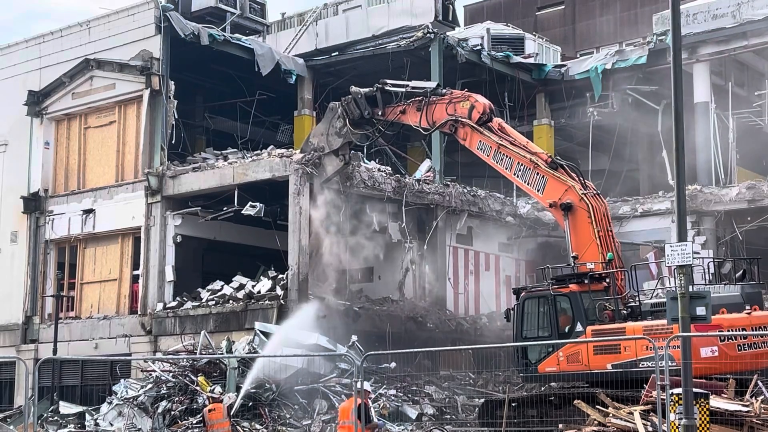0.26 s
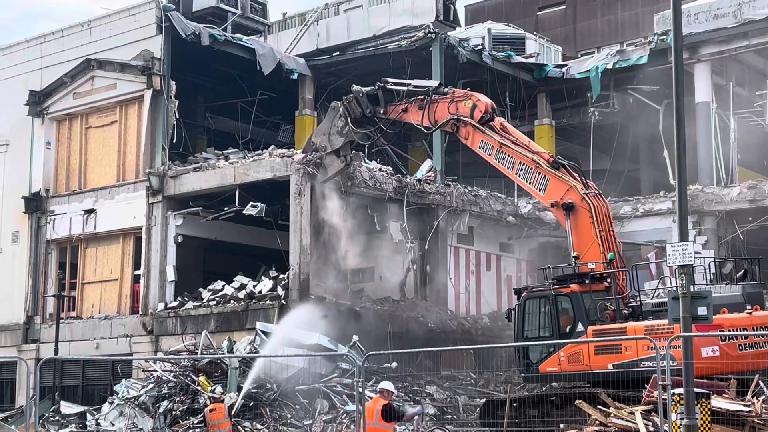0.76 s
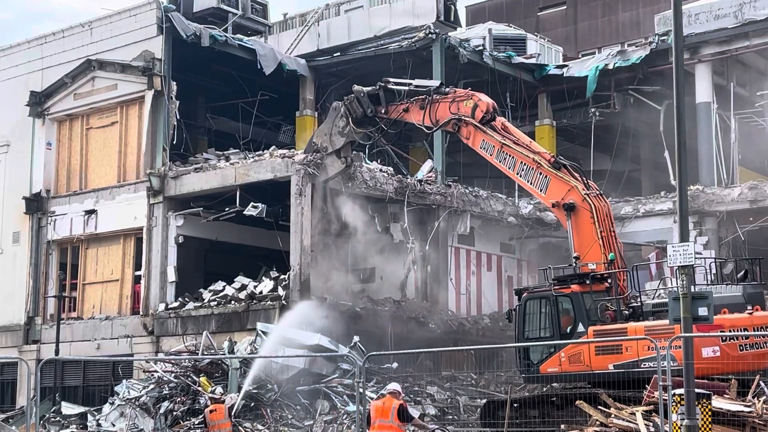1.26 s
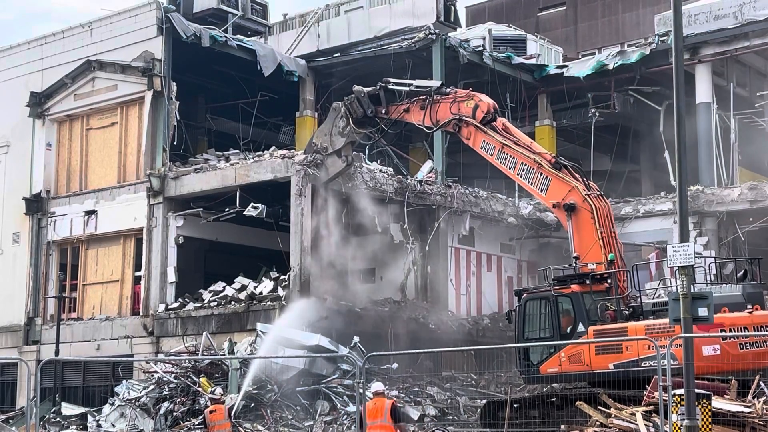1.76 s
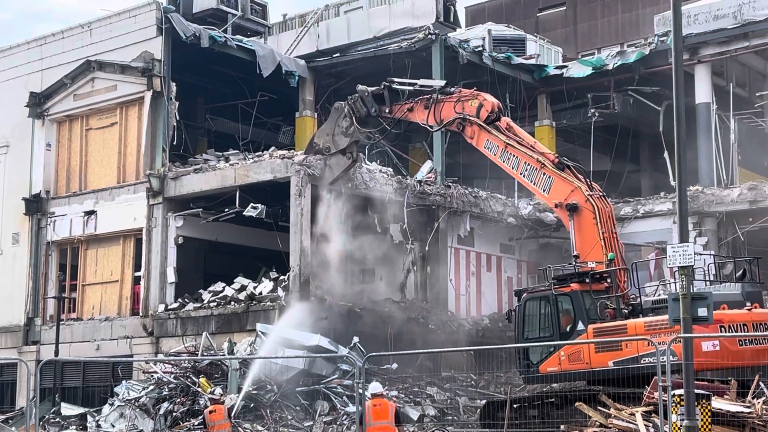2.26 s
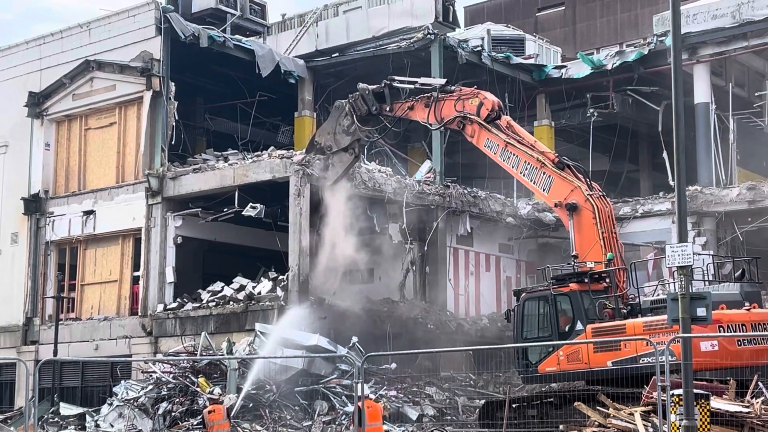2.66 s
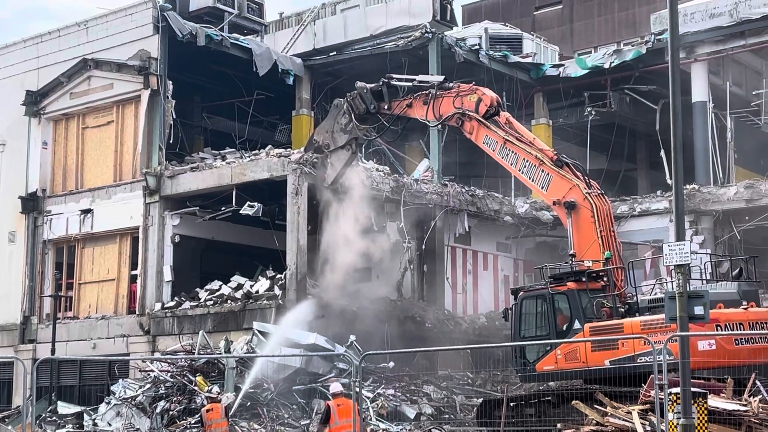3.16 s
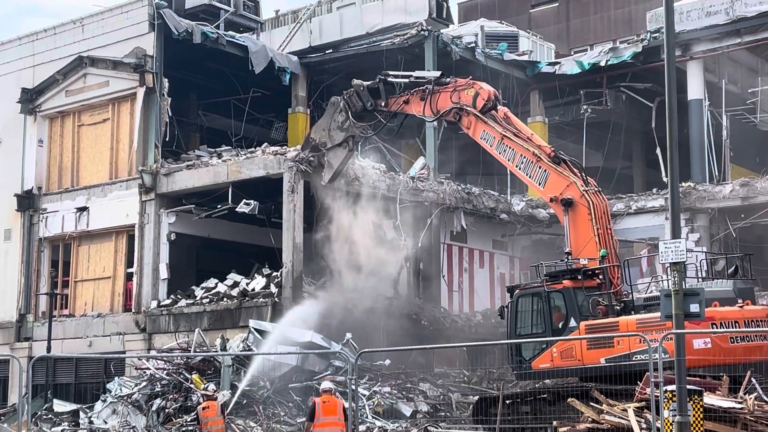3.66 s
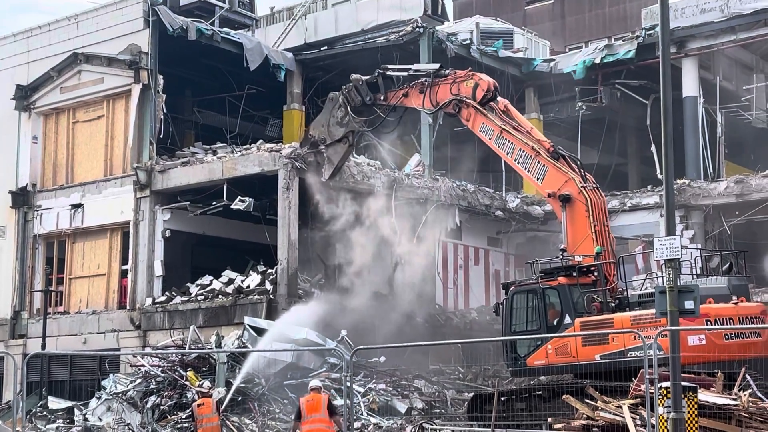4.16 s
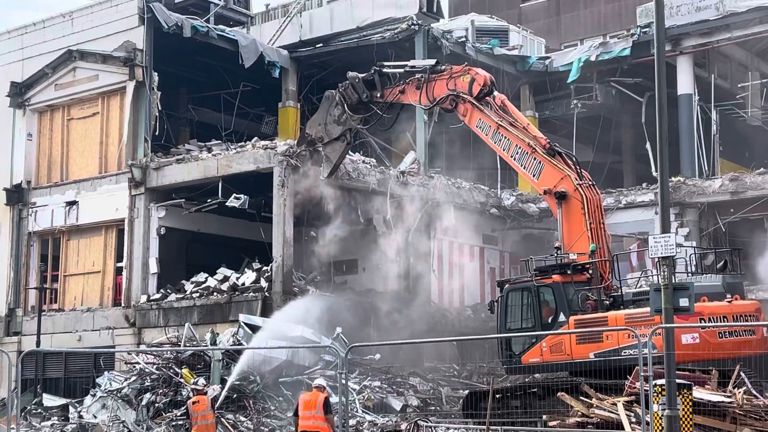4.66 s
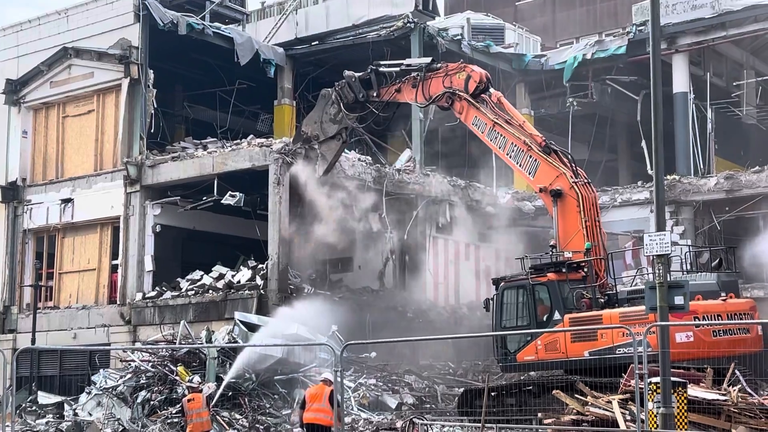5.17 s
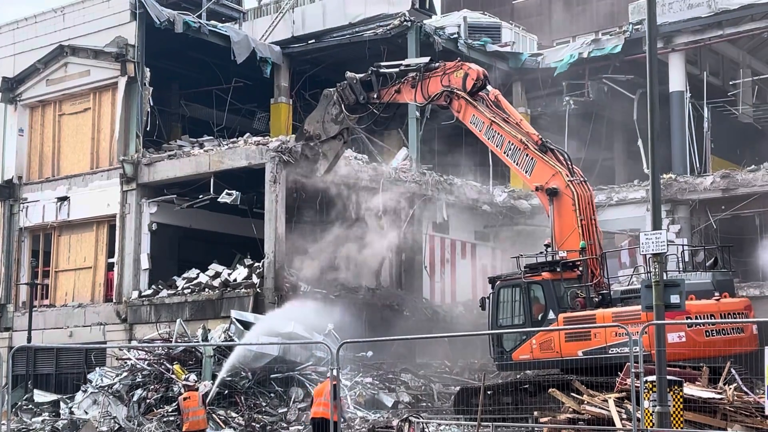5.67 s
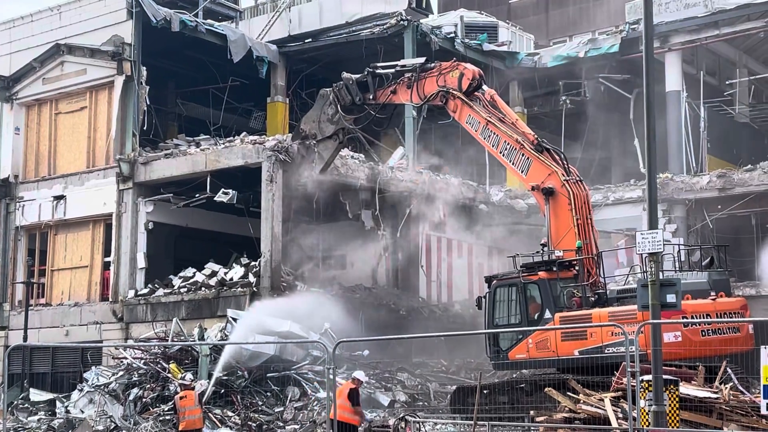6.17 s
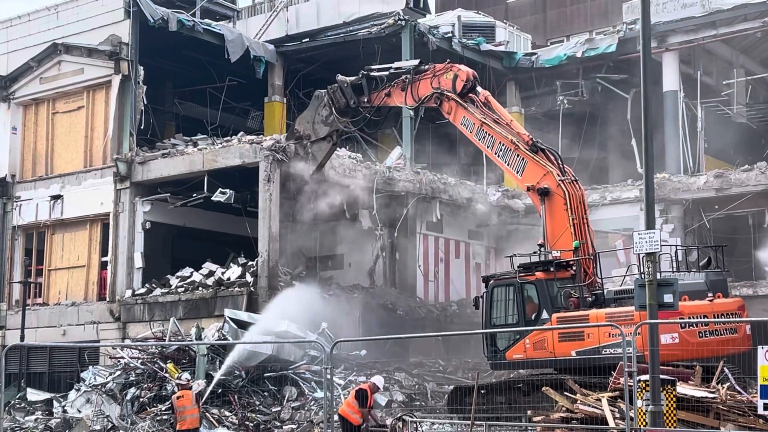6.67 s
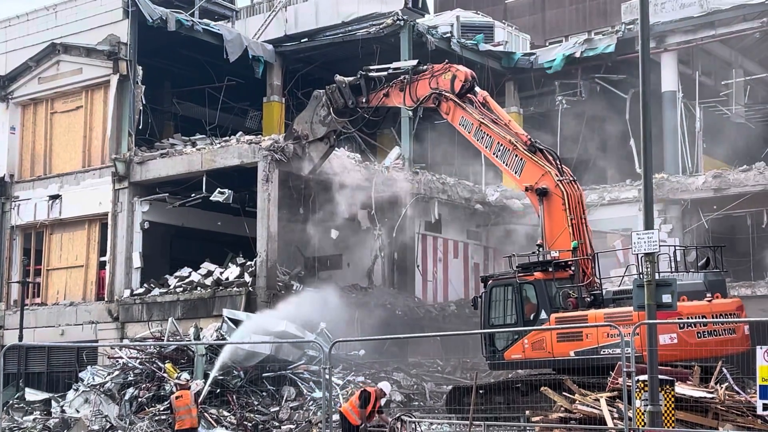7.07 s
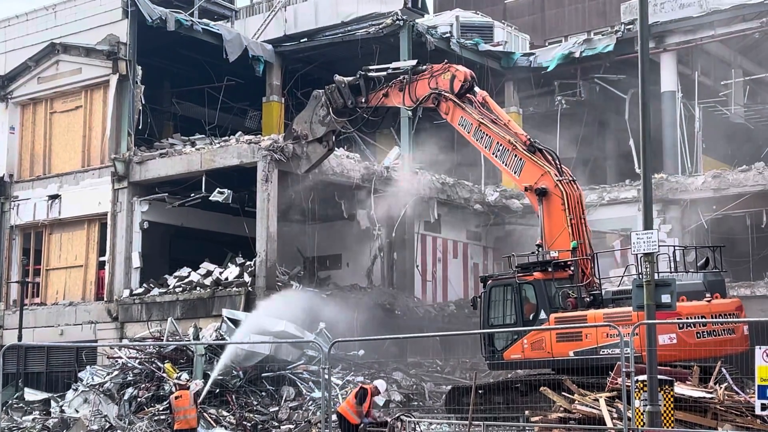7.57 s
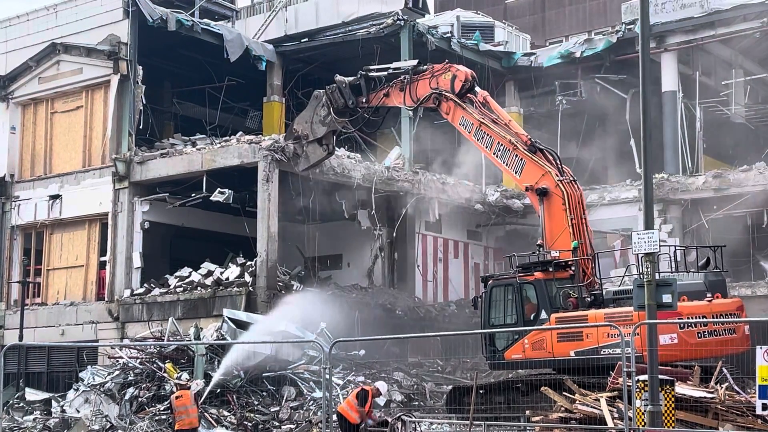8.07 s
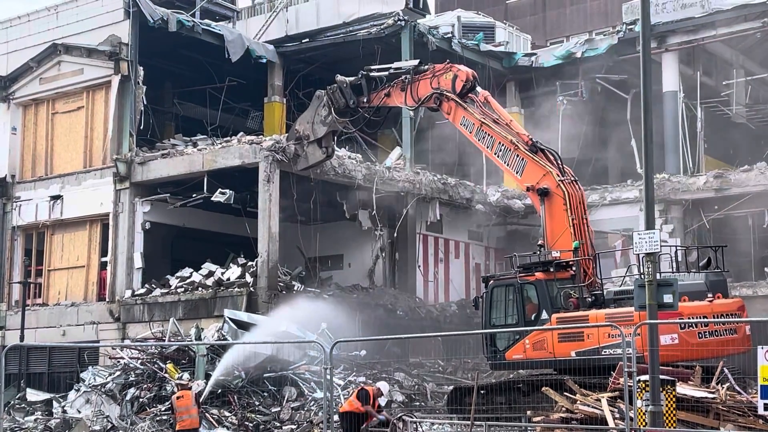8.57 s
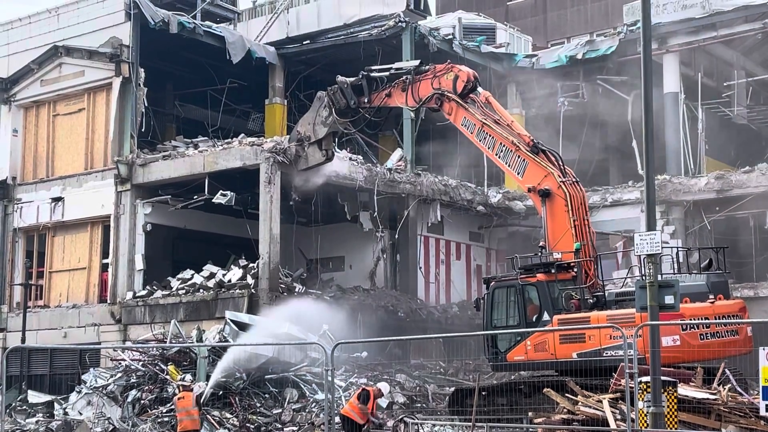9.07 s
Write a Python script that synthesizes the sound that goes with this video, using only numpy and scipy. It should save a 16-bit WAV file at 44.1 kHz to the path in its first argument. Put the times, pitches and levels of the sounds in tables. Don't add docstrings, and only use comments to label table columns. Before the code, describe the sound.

Wind buffets the microphone as a diesel excavator crushes concrete, with cracks, thuds and pouring rubble over a steady hose hiss.

```python
import sys
import numpy as np
from scipy import signal
from scipy.fft import rfft, irfft
from scipy.io import wavfile

SR = 44100
rng = np.random.default_rng(int(sys.argv[2]) if len(sys.argv) > 2 else 0)


def transcribe(u):
    v = np.clip(np.atleast_2d(u).T, -1, 1)
    q = np.round(v * 32767).astype(np.int16)
    wavfile.write(sys.argv[1], SR, q)


def attenuation_scalar(level_db):
    decades = np.asarray(level_db, float) / 20
    return 10 ** decades


N = 411012
CLUMP_DB = 1.3


def in_time(rows):
    s, *columns = np.transpose(rows)
    return [np.interp(np.arange(N) / SR, s, c) for c in columns]


def at_hz(points, hz):
    table_hz, values = np.transpose(points)
    return np.interp(np.log(hz + 1), np.log(table_hz + 1), values)


def rms_one(x):
    return x / np.sqrt(np.mean(x ** 2) + 1e-20)


def drift(rate):
    r = np.exp(-40 * np.pi * rate / SR)
    white = rng.standard_normal(N // 20 + 2002)
    slow = signal.lfilter([1], [1, -2 * r, r * r], white)[2000:]
    return np.interp(np.arange(N) / 20, np.arange(len(slow)), rms_one(slow))


def band(x, low_hz, high_hz, order=2):
    return signal.sosfilt(signal.butter(order, [low_hz, high_hz], "band", fs=SR, output="sos"), x)


def resonance(x, hz, width_hz):
    r = np.exp(-np.pi * width_hz / SR)
    poles = [1, -2 * r * np.cos(2 * np.pi * hz / SR), r * r]
    return signal.lfilter([(1 - r * r) / 2, 0, (r * r - 1) / 2], poles, x)


def body(x, modes):
    return sum((-1) ** k * attenuation_scalar(db) * resonance(x, hz, w) for k, (hz, w, db) in enumerate(modes))


def coloured(x, spectrum):
    hz = np.fft.rfftfreq(N, 1 / SR)
    slope_db = at_hz(spectrum, hz) - 24 * np.maximum(np.log2(spectrum[0][0] / (hz + 1)), 0)
    return rms_one(irfft(rfft(x) * attenuation_scalar(slope_db), N))


def grains(per_s, spread_db):
    sizes = attenuation_scalar(spread_db * np.minimum(rng.exponential(1, (2, N)), 5))
    signs = rng.choice([-1, 1], (2, N))
    return sizes * signs * (rng.random((2, N)) < per_s / SR)


def bursts(rows, rise_db_s, fall_db_s, floor_db):
    t, out = np.arange(0, N, 32) / SR, floor_db
    for s, length, db, swell_db in rows:
        hold = db + swell_db * (np.clip((t - s) / length, 0, 1) - .5)
        rise = rise_db_s * np.maximum(s - t, 0)
        fall = fall_db_s * np.maximum(t - s - length, 0)
        out = np.maximum(out, hold - rise - fall)
    return np.interp(np.arange(N) / SR, t, out)


def add(out, at_s, piece):
    i = round(at_s * SR)
    out[:, i:i + piece.shape[1]] += piece[:, :N - i]


# [f/Hz, level/dB per Hz]
SPRAY_COLOUR = [(200, 16), (500, 2), (1000, -8), (1900, -21), (2200, -8), (2800, -24), (5000, -14),
                (7000, -13), (10000, -10), (13000, -11.5), (15000, -15.5), (16000, -50)]
# [t/s, level/dB]
HOSE_SWEEP = [(0, 1), (0.55, 1.5), (1.5, 0.5), (2.75, 1.5), (3.2, 0), (8.35, 0.7), (8.5, -2.5), (8.9, -3),
              (9.2, 0.5)]
SPRAY_DB = -39


def spray():
    level_db = SPRAY_DB + in_time(HOSE_SWEEP)[0] + CLUMP_DB / 2 * drift(2.8)
    return attenuation_scalar(level_db) * coloured(rng.standard_normal((2, N)), SPRAY_COLOUR)


# [t/s, level/dB]
GUST_THUMP = [(0, -20), (0.33, -24.5), (0.43, -27), (0.88, -23), (0.95, -21.5), (1.17, -27), (1.45, -20.5),
              (1.8, -22), (1.92, -27), (2.2, -23.5), (2.4, -29), (2.9, -25.5), (3.6, -25.5), (4.6, -28.5),
              (5.8, -25), (6.95, -28.5), (8.0, -23), (9.32, -13.5)]
# [t/s, length/s, level/dB, swell from start to end/dB]
GUST_RASP = [(0.0, 0.19, -18, 0.5), (0.225, 0.074, -17.5, -2), (0.3, 0.054, -19, 2.5),
             (0.862, 0.083, -22, 8), (0.934, 0.28, -19, 4), (1.255, 0.055, -18.5, -1),
             (1.337, 0.021, -15, 0), (1.385, 0.055, -17, -5), (1.45, 0.028, -16.5, 7), (1.51, .03, -22, 1),
             (1.55, 0.2, -22.5, -5.5), (1.775, 0.098, -25, -4), (1.955, 0.07, -27, -2),
             (2.04, 0.22, -24, 2), (2.23, 0.13, -23.5, -8), (2.48, 0.043, -27.5, 13), (2.6, 0.13, -26, -4),
             (2.78, 0.14, -25, 3), (3.05, 0.17, -30.5, 13), (3.26, 0.18, -24.5, 6.5), (3.51, 0.042, -20, 7),
             (3.58, 0.082, -21.5, -6), (3.695, 0.054, -19.5, -7), (3.75, 0.012, -24.5, -10),
             (3.79, 0.031, -23, -2), (3.97, 0.1, -30, 7), (4.35, 0.01, -29, 3), (5.15, 0.21, -31, 8),
             (5.42, 0.19, -30.5, -3), (5.605, 0.26, -26, -1), (5.88, 0.1, -18, 6), (6.0, 0.28, -27, -12),
             (6.28, 0.22, -29.5, 3.5), (6.55, 0.18, -33.5, -8), (7.2, 0.52, -36, 6)]
GUST_RISE_DB_S, GUST_FALL_DB_S, LULL_DB = 2500, 450, -41.5
THUMP_FOLLOWS, MIDDLE_SHARE = 0.24, 0.47


def wind():
    rasp_db = bursts(GUST_RASP, GUST_RISE_DB_S, GUST_FALL_DB_S, LULL_DB)
    thump_db = in_time(GUST_THUMP)[0] + THUMP_FOLLOWS * (rasp_db - rasp_db.mean())
    middle_db = thump_db + MIDDLE_SHARE * (rasp_db - thump_db)
    edge_db = rasp_db + 1.26 * (rasp_db + 18.0)
    lumps, white = drift(39.0), rng.standard_normal((2, 2, N))
    thump = band(white[0], 42.0, 119.0) * attenuation_scalar(1.54 * lumps)
    middle = band(white[1], 90.6, 304.0, order=3) * attenuation_scalar(2.25 * lumps + 2.07 * drift(9.4))
    rasp = band(white[0], 262, 487) * attenuation_scalar(2.54 * lumps + 2.9 * drift(38))
    edge = band(white[1], 567, 852, order=3) * attenuation_scalar(1.0 * lumps + 3.6 * drift(30))
    out = attenuation_scalar(thump_db - 1.5) * rms_one(thump)
    out += attenuation_scalar(middle_db - 2.5) * rms_one(middle)
    out += attenuation_scalar(rasp_db - 4.5) * rms_one(rasp)
    return out + attenuation_scalar(edge_db - 13.5) * rms_one(edge)


# [t
# of the crest/s, peak level/dB, f/Hz]
SWINGS = [(0.04, -18, 397), (0.093, -10, 346), (0.106, -7, 543), (0.16, -5, 420), (0.24, -15, 378),
          (0.266, -11.5, 491), (0.314, -19, 329), (0.833, -12.5, 335), (0.945, -2.5, 426),
          (0.956, -10, 435), (1.002, -9, 490), (1.103, -12, 413), (1.118, -12, 299), (1.158, -8.5, 394),
          (1.188, -7, 550), (1.206, -9, 500), (1.271, -6.5, 516), (1.286, -9, 450), (1.3, -10, 419),
          (1.343, -7, 367), (1.402, -5.5, 366), (1.419, -5, 376), (1.472, -2.5, 480), (1.484, -1, 360),
          (1.618, -9.5, 344), (1.635, -12, 447), (1.791, -11, 280), (1.964, -16.5, 308), (1.98, -17, 367),
          (2.134, -10.5, 413), (2.199, -16, 354), (2.248, -7.5, 368), (2.274, -8.5, 279),
          (2.488, -14.5, 390), (2.836, -15, 325), (2.853, -11, 346), (3.193, -13.5, 404),
          (3.286, -12.5, 284), (3.338, -12, 266), (3.413, -14.5, 326), (3.515, -14, 283), (3.539, -13, 436),
          (3.612, -9, 430), (3.625, -13, 364), (3.706, -17, 402), (3.731, -15, 348), (3.98, -16.5, 361),
          (4.362, -16.5, 327), (5.616, -12.5, 368), (5.656, -14, 250), (5.763, -17, 296),
          (5.885, -9.5, 325), (5.899, -20, 480), (5.916, -11, 348), (5.927, -12, 330), (5.945, -5, 262),
          (5.961, -13, 325), (5.975, -5, 332), (5.986, -12, 270), (6.061, -11.5, 360)]
SWING_CYCLES, SWING_DB, TEAR_SHARE = 1.05, -2.0, 0.4


def buffets():
    half = round(.02 * SR)
    out, t = np.zeros((2, N)), np.arange(-half, half) / SR
    phases = rng.uniform(0, 2 * np.pi, (len(SWINGS), 2, 2, 1))
    for (s, peak_db, hz), phase in zip(SWINGS, phases):
        swing = np.sin(2 * np.pi * hz * t + phase[0])
        swing = swing + TEAR_SHARE * np.sin(2 * np.pi * 1.57 * hz * t + phase[1])
        add(out, s + t[0], attenuation_scalar(peak_db + SWING_DB) * swing * np.exp(-(t * hz / SWING_CYCLES) ** 2))
    return out


# [t/s, level/dB]
POUR_FLOW = [(0.0, -27), (0.3, -32), (1.14, -31.5), (1.82, -34), (3.2, -33.5), (3.66, -31), (4.8, -31.5),
             (5.25, -29.5), (5.6, -24.5), (6.1, -31), (6.49, -30.5), (7.03, -29), (7.32, -31.5),
             (7.66, -32), (8.3, -32), (8.9, -32.5), (9.05, -23.5), (9.32, -29.5)]
# [f/Hz, level/dB per Hz]
CRUNCH_COLOUR = [(290, -50), (500, -7), (701, 2), (1130, 0), (1960, -2), (2160, -9.5), (3000, -24),
                 (3900, -14), (6600, -120)]
# [f/Hz, level/dB per Hz]
GRIT_COLOUR = [(1800, -8), (2600, 8), (4500, 0), (7000, 0.5), (10000, -21.5), (13000, -10), (16000, -47)]
GRIT_DB, GRIT_FOLLOWS = -37.0, 0.84


def pour():
    crunch_db, = in_time(POUR_FLOW)
    grit_db = GRIT_DB + GRIT_FOLLOWS * (crunch_db - crunch_db.mean())
    clumps_db = CLUMP_DB * drift(31.0)
    crunch = coloured(grains(per_s=4600, spread_db=2.5), CRUNCH_COLOUR)
    grit = coloured(grains(per_s=9300, spread_db=2.0), GRIT_COLOUR)
    return attenuation_scalar(crunch_db - 7.5 + clumps_db) * crunch + attenuation_scalar(grit_db - 4.5 + clumps_db) * grit


# [t/s, peak level/dB]
PEBBLES = [(0.33, -30), (0.762, -35), (0.825, -34), (1.144, -30), (1.247, -30), (1.7, -35), (2.745, -33),
           (2.8, -30), (2.864, -32), (3.158, -35), (3.462, -37), (3.756, -34), (4.29, -36), (4.35, -32),
           (5.38, -28), (5.56, -29), (6.231, -51), (7.17, -29), (8.374, -32)]
TICK_DECAY_S, TICK_DB = .012, -3


def pebbles():
    out, t = np.zeros((2, N)), np.arange(round(.06 * SR)) / SR
    shape = (1 - np.exp(-t / .003)) * np.exp(-t / TICK_DECAY_S)
    for s, peak_db in PEBBLES:
        white = rng.standard_normal((2, len(t)))
        puff = rms_one(band(signal.lfilter([1], [1, -.6], white), 2500, 12500))
        add(out, s, attenuation_scalar(peak_db + TICK_DB) * puff * shape)
    return out


# [t of the crest/s, peak level/dB, f/Hz]
RINGS = [(0.17, -33, 5085), (0.197, -39, 5090), (1.206, -33, 2280), (1.211, -41, 3450), (1.261, -31, 1450),
         (1.27, -37, 3250), (1.281, -30, 1291), (2.058, -29.5, 1940), (2.24, -40, 4360),
         (2.243, -44, 3488), (2.246, -43, 1700), (3.027, -35, 1650), (3.265, -33, 1880),
         (3.546, -28, 1700), (3.551, -30, 3270), (3.551, -34, 4400), (4.159, -42, 4866), (5.15, -30, 1310),
         (5.152, -30, 3300), (5.152, -29, 1705), (5.152, -38, 4565), (5.154, -31, 2720),
         (5.156, -33, 1937), (5.163, -23, 1020), (5.268, -32, 1136), (5.454, -31, 3670), (5.49, -33, 4220),
         (5.506, -38, 2300), (5.914, -20, 910), (5.959, -30, 3260), (5.964, -31, 4240), (5.966, -31, 3870),
         (5.964, -27, 1119), (6.376, -30, 947), (6.936, -27, 1080), (6.943, -33, 3200), (6.946, -24, 1305),
         (6.95, -38, 4177), (6.964, -30, 1910), (7.05, -36, 3330), (7.574, -45, 2670), (8.231, -38, 3100),
         (8.302, -40, 3800), (8.311, -29, 1730), (8.313, -42, 3488), (8.322, -29, 1335),
         (8.324, -48, 3186), (8.338, -22.5, 1970), (8.356, -36, 2583), (8.358, -44, 3720),
         (8.376, -40, 3746), (8.379, -31, 834), (8.397, -32, 1507), (8.472, -40, 1981), (8.49, -37, 2010),
         (8.948, -33, 1950), (8.993, -37, 4870), (8.998, -39, 4360), (9.067, -36, 3770),
         (9.075, -41, 4870)]
CLINK_RISE_S, CLINK_DECAY_S, CLINK_DB = .004, 0.0062, 1


def clinks():
    out, t = np.zeros((2, N)), np.arange(round(.08 * SR)) / SR
    shape = (1 - np.exp(-(t / CLINK_RISE_S) ** 2)) * np.exp(-t / CLINK_DECAY_S)
    shape = shape / shape.max()
    for (s, peak_db, hz), phase in zip(RINGS, rng.uniform(0, 2 * np.pi, (len(RINGS), 2, 1))):
        pair = np.sin(2 * np.pi * hz * t + phase) + .6 * np.sin(2 * np.pi * 1.08 * hz * t - phase)
        add(out, s - 1.5 * CLINK_RISE_S, attenuation_scalar(peak_db + CLINK_DB) * shape * pair)
    return out


# [t of the crest/s, peak level/dB, f/Hz]
SLAB_KNOCKS = [(0.045, -17, 545), (0.051, -26, 1022), (0.088, -22, 1017), (0.133, -23, 957),
               (1.02, -20, 590), (1.081, -23, 586), (1.167, -30, 938), (1.269, -24, 2000), (2.26, -20, 530),
               (3.536, -19, 1040), (3.708, -15, 537), (5.701, -28, 1995), (5.898, -13, 987),
               (6.364, -21, 1018), (6.658, -25, 934), (6.746, -26, 1093), (6.932, -25, 1150),
               (7.07, -29, 1100), (8.856, -19, 504), (8.958, -18, 531), (9.083, -16, 974),
               (9.111, -20, 977), (9.14, -17, 911), (9.163, -13, 955), (9.178, -15, 965), (9.244, -18, 939),
               (9.259, -15, 893), (9.287, -16, 516)]
KNOCK_CYCLES, KNOCK_DB = 2.2, 0.0


def knocks():
    out, t = np.zeros((2, N)), np.arange(-round(0.017 * SR), round(.015 * SR)) / SR
    for (s, peak_db, hz), phase in zip(SLAB_KNOCKS, rng.uniform(0, 2 * np.pi, (len(SLAB_KNOCKS), 2, 1))):
        swing = np.sin(2 * np.pi * hz * t + phase) * np.exp(-(t * hz / KNOCK_CYCLES) ** 2)
        add(out, s + t[0], attenuation_scalar(peak_db + KNOCK_DB) * swing)
    return out


# [t/s, peak level/dB, f/Hz]
LANDINGS = [(0.59, -11, 150), (0.78, -13, 195), (0.865, -9, 200), (1.3, -6, 150), (3.535, -12, 520),
            (4.018, -9.5, 170), (4.253, -8, 165), (4.935, -6, 137), (5.627, -6, 190), (5.671, -6, 145),
            (5.758, -6, 177), (5.912, -5, 250), (5.938, -2.5, 215), (5.966, -2.5, 225), (6.39, -11, 120),
            (6.601, -11, 110), (7.14, -11, 110), (7.427, -4.5, 122), (8.395, -12, 100)]


def thuds():
    out, t = np.zeros((2, N)), np.arange(round(.3 * SR)) / SR
    shape = (1 - np.exp(-t / 0.0029)) * np.exp(-t / 0.012)
    for s, peak_db, hz in LANDINGS:
        add(out, s, attenuation_scalar(peak_db - 2.5) * np.sin(2 * np.pi * hz * t) * shape * np.ones((2, 1)))
    return out


# [t/s, peak level/dB, ring f/Hz, treble level above the peak/dB]
CHIPS = [(0.195, -23, 2640, -27), (0.519, -39.5, 845, 9), (0.654, -25.5, 1870, -5), (1.199, -14, 865, -20),
         (1.556, -19.5, 800, -13.5), (1.87, -27.5, 3480, -17), (2.05, -29, 2320, -4.5),
         (2.233, -24, 2610, -19), (2.646, -40, 900, 6.5), (3.01, -22, 1370, -13), (3.238, -26, 1880, -8),
         (3.962, -27, 1420, -28), (4.507, -27, 1220, -12), (4.551, -27, 1170, -7), (5.769, -33, 1210, 6),
         (5.958, -26.5, 3730, -4), (6.167, -20.5, 850, -13), (6.893, -43, 770, 8), (7.876, -42, 1280, 6),
         (8.227, -32, 1470, -6), (8.463, -30, 1840, -22), (8.847, -31, 1460, -23), (8.928, -14, 865, -24.5),
         (8.989, -25.5, 902, -5), (9.137, -17, 905, -36), (9.241, -28, 896, -16), (9.273, -17, 850, -35)]
# [t/s, peak level/dB, ring f/Hz, treble level above the peak/dB]
BROKEN_LUMPS = [(1.257, -19.5, 980, -25), (3.298, -29.5, 1050, -4.5), (3.527, -16.5, 790, -14),
                (3.546, -33, 3300, -12), (3.676, -22, 1570, -26), (4.155, -26.5, 1180, -8),
                (4.9, -27, 1300, -10.5), (5.147, -14, 960, -12), (5.247, -18.5, 1010, -25),
                (5.424, -16, 960, -10.5), (5.2, -22.5, 1800, -23), (5.3, -38, 1700, -5),
                (5.47, -22.5, 2400, -11), (5.52, -29, 1510, -3), (5.612, -18.5, 1000, -12),
                (5.879, -11, 860, -22), (6.084, -25.5, 1350, -12), (6.331, -18, 905, -22),
                (6.447, -29.5, 910, -20), (6.617, -17, 900, -20), (6.93, -16.5, 1120, -13),
                (7.045, -25, 2500, -14), (7.555, -21, 1550, -13.5), (8.291, -22, 1730, -23),
                (8.349, -22, 1300, -26), (8.421, -27, 1660, -26), (6.99, -24, 900, -14),
                (9.052, -18.5, 840, -17)]
CHIP_DECAY_S, LUMP_DECAY_S = 0.027, 0.083
SNAP_DB, SNAP_S = -4, 0.0058


def breaks():
    out, t = np.zeros((2, N)), np.arange(round(.3 * SR)) / SR
    snap = attenuation_scalar(SNAP_DB) * np.exp(-t / SNAP_S)
    walls = 0.66 * np.exp(-t / 0.15)
    onset = 1 - np.exp(-t / 0.00057)
    fines = 1 - 0.6 * np.exp(-t / 0.007)
    events = [(*c, CHIP_DECAY_S) for c in CHIPS] + [(*c, LUMP_DECAY_S) for c in BROKEN_LUMPS]
    for s, peak_db, hz, treble_db, decay in events:
        white = rng.standard_normal((3, 2, len(t)))
        trail = (snap + np.exp(-(t / decay) ** 2) + walls) * onset
        stone = rms_one(band(white[0], 0.44 * hz, 2.22 * hz))
        ringing = rms_one(resonance(resonance(white[1], hz, 0.43 * hz), hz, 0.46 * hz))
        dust = fines * rms_one(band(signal.lfilter([1], [1, -.6], white[2]), 2400, 12800))
        mix = 1.51 * stone + 1.18 * ringing + attenuation_scalar(treble_db + 12.5) * dust
        add(out, s, attenuation_scalar(peak_db - 21.5) * trail * mix)
    return out


# [t/s, length/s, f/Hz, level/dB, level per overtone/dB]
PIVOT_SQUEALS = [(0.112, 0.1, 5095, -36, -60), (0.2, .14, 5085, -43, -60), (2.209, 0.09, 5095, -42.5, -60),
                 (2.305, .04, 5090, -42.5, -60), (2.35, .1, 5100, -48, -60), (2.228, 0.045, 882, -27, -6.5),
                 (4.55, .05, 5090, -43, -60), (4.718, 0.15, 5085, -40.5, -60),
                 (6.794, 0.06, 5090, -41, -60), (6.875, 0.03, 5120, -40, -60), (5.25, .06, 5050, -45, -60),
                 (8.445, .075, 5090, -44, -60), (8.64, .05, 365, -24, -20), (8.69, .045, 415, -26, -20),
                 (8.73, .045, 470, -26, -20)]
HUM_HZ, HUM_WIDTH_HZ, HUM_DB = 5090, 31, -60.5
SQUEAL_FADE_DB, SLIP_DB = -4, 3.6


def squeals():
    white = rng.standard_normal((2, N))
    hum = resonance(resonance(white, HUM_HZ, HUM_WIDTH_HZ), HUM_HZ, HUM_WIDTH_HZ)
    out = attenuation_scalar(HUM_DB) * rms_one(hum)
    wobble, flutter = drift(200), drift(130)
    for s, length, hz, db, overtone_db in PIVOT_SQUEALS:
        t, i = np.arange(round(length * SR)) / SR, round(s * SR)
        now = slice(i, i + len(t))
        pitch = hz * (1 + 0.004 * np.exp(-t / 0.016) + 0.006 * wobble[now])
        turns = np.cumsum(pitch) / SR
        partials = range(min(5, int(9000 // hz)))
        tone = sum(attenuation_scalar(overtone_db * k) * np.sin(2 * np.pi * (k + 1) * turns) for k in partials)
        ends = np.minimum(np.minimum(t, length - t) / 0.0069, 1)
        shape = ends * attenuation_scalar(SQUEAL_FADE_DB * t / length + SLIP_DB * flutter[now])
        add(out, s, attenuation_scalar(db) * tone * shape * np.ones((2, 1)))
    return out


# [t/s, length/s, level/dB, swell from start to end/dB]
JAW_BITES = [
    (8.64, 0.16, -32.5, -2),
    (8.85, 0.025, -23.5, -3),
    (8.93, 0.081, -23, -2),
    (9.06, 0.056, -20, 1.5),
    (9.135, 0.05, -18.5, 3),
    (9.24, 0.048, -22.5, 10.5),
]
# [f/Hz, width/Hz, level/dB]
JAW_MODES = [(361, 30, 0.5), (527, 68, -5.5), (570, 125, -10), (785, 105, -9), (900, 100, -9),
             (1300, 830, -23)]
BITE_RISE_DB_S, BITE_FALL_DB_S, JAW_IDLE_DB = 711, 280, -62


def jaw():
    level_db = bursts(JAW_BITES, BITE_RISE_DB_S, BITE_FALL_DB_S, JAW_IDLE_DB)
    return attenuation_scalar(level_db) * rms_one(body(grains(per_s=690, spread_db=1.5), JAW_MODES))


# [t/s, level/dB]
ENGINE_LOAD = [(0, -58.5), (2.4, -31.5), (4.4, -44), (4.62, -44), (4.82, -27), (5.55, -25.5), (5.68, -23.5),
               (5.83, -22.5), (6.05, -35), (6.55, -31.5), (6.78, -43), (7.14, -25), (8.0, -25.5),
               (8.9, -24.5), (9.32, -24.5)]
FIRINGS = [8.5, 1.5, -8.5]
# [f/Hz, width/Hz, level/dB]
EXHAUST_MODES = [(67, 8.7, -34), (144.6, 52, -0.5), (169.3, 23.4, 6), (193, 15.7, 1), (218.8, 11, -4),
                 (232.5, 15, -3), (262, 10, -1)]
# [multiple of the shaft speed, level/dB]
SHAFT_TONES = [(15, -47), (45, -52), (54, -50), (63, -53), (78, -55), (106, -58)]
SHAFT_HZ, PIPE_LOW_HZ, PUMP_DB = 23.73, 62, 0.5


def engine():
    turns = SHAFT_HZ * np.arange(N) / SR
    firing = np.floor(turns * len(FIRINGS)).astype(int)
    at = np.flatnonzero(np.diff(firing)) + 1
    strength_db = np.array(FIRINGS)[firing[at] % len(FIRINGS)]
    pulses = np.zeros(N) + 1e-18
    pulses[at] = attenuation_scalar(strength_db + 2.4 * rng.standard_normal(len(at)))
    pipe = rms_one(band(body(pulses, EXHAUST_MODES), PIPE_LOW_HZ, 283, order=5))
    out = attenuation_scalar(in_time(ENGINE_LOAD)[0]) * pipe
    for k, db in SHAFT_TONES:
        out += attenuation_scalar(db + PUMP_DB + CLUMP_DB * drift(1.8)) * np.sin(2 * np.pi * k * turns)
    return np.array([out, np.roll(out, 900)])


# [f/Hz, likeness 0-1]
PORT_LIKENESS = [(60, .96), (250, .9), (700, .84), (1400, .68), (2500, .78), (3300, .9), (3600, .992),
                 (10000, .99), (12500, .975), (15000, .97)]
# [f/Hz, level/dB]
PORT_BALANCE = [(40, 0), (90, -0.5), (200, -4), (400, -3), (700, -3.5), (1300, -8.5), (2400, 0.8),
                (3600, 1)]
# [f/Hz, half turns]
PORT_LEAD = [(0, 0), (3400, -.04), (5050, .03), (5300, .52), (6500, .8), (6930, 1), (7550, 1.4),
             (7750, 1.97), (10200, 2.04), (10450, 2.42), (11700, 2.82), (11900, 2.97), (13600, 3.04),
             (14500, 3.5), (15200, 4), (16000, 4)]
EVEN_HZ = 3600
WANDER_RAD, WANDER_PER_S, WANDER_TOP_HZ = .1, 7, 9000


def scene():
    heap = pour() + pebbles() + clinks() + knocks() + thuds() + breaks()
    excavator = squeals() + jaw() + engine()
    direct, diffuse = rfft(spray() + wind() + buffets() + heap + excavator)
    hz = np.fft.rfftfreq(N, 1 / SR)
    alike = np.clip(at_hz(PORT_LIKENESS, hz), 0, 1)
    half_turns = np.interp(hz, *np.transpose(PORT_LEAD))
    balance = attenuation_scalar(.5 * at_hz(PORT_BALANCE, hz) * (hz < EVEN_HZ))
    lead = np.exp(.5j * np.pi * half_turns) * balance
    common = np.sqrt((1 + alike) / 2) * direct
    apart = np.sqrt((1 - alike) / 2) * diffuse
    ports = np.array([(common + apart) * lead, (common - apart) / lead])
    opposed = np.sin(np.pi * half_turns / 2) ** 2 * (hz < WANDER_TOP_HZ)
    shift = irfft(1j * opposed * ports * [[1], [-1]], N)
    return irfft(ports, N) + WANDER_RAD * drift(WANDER_PER_S) * shift


def top_cut(x):
    return signal.sosfilt(signal.butter(12, 15750, fs=SR, output="sos"), x)


AIR_HZ, AIR_SPLIT_HZ, AIR_TOP_HZ = 13400, 14700, 15750


def record(dry):
    x = signal.sosfilt(signal.butter(4, 38, "high", fs=SR, output="sos"), dry)
    x = 1.051 * np.tanh(x / 0.91)
    air = band(x, AIR_HZ, AIR_SPLIT_HZ, order=6) * attenuation_scalar(-.5 + 2.6 * drift(18))
    air += band(x, AIR_SPLIT_HZ, AIR_TOP_HZ, order=6) * attenuation_scalar(-4.5 + 5.0 * drift(14))
    below = signal.sosfilt(signal.ellip(8, .3, 70, AIR_HZ, fs=SR, output="sos"), x)
    return top_cut(below + air)


dry = scene()
out = record(dry)
transcribe(out)
```